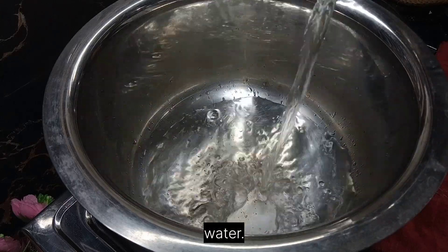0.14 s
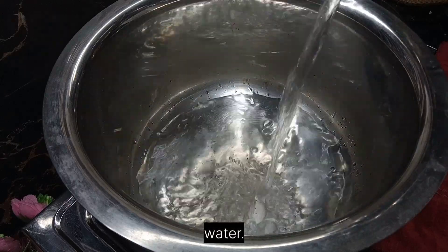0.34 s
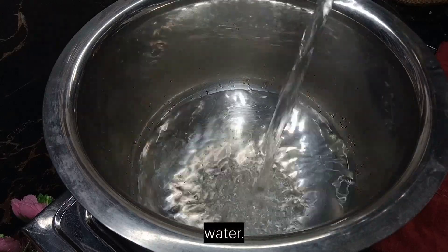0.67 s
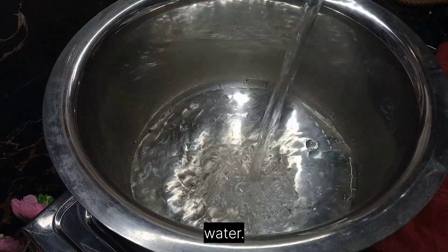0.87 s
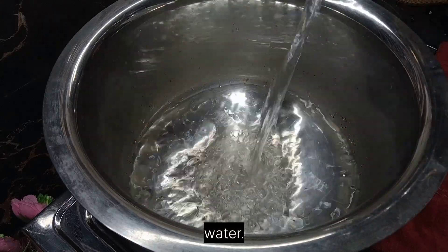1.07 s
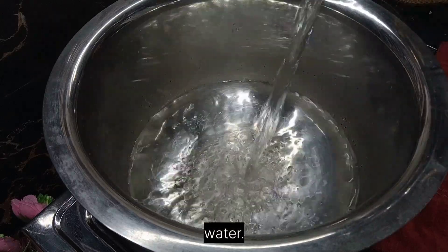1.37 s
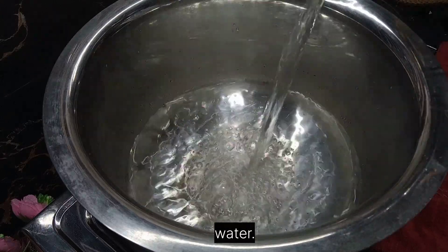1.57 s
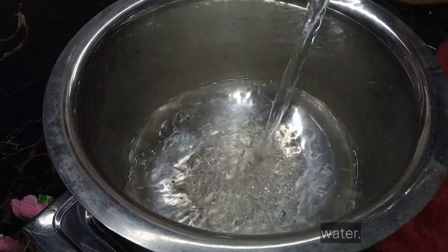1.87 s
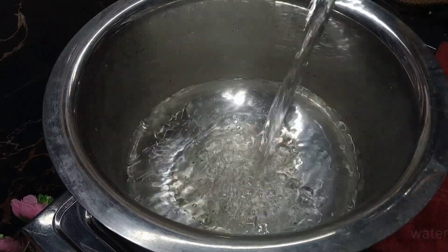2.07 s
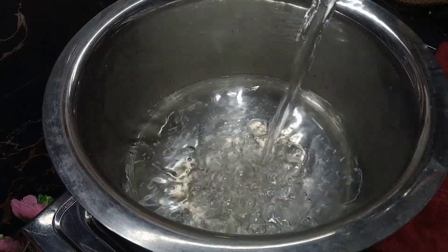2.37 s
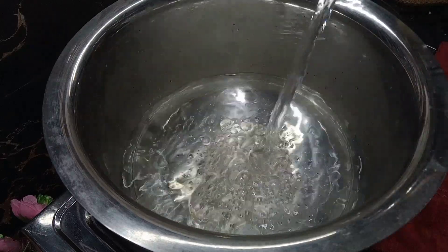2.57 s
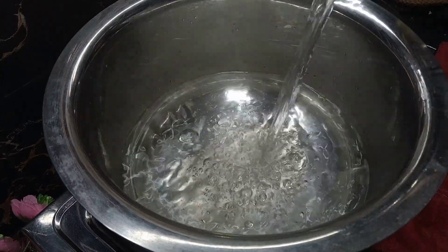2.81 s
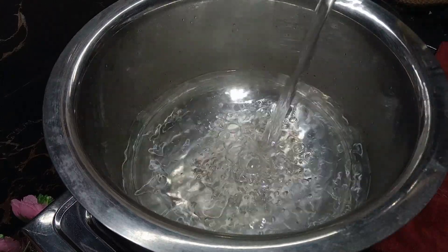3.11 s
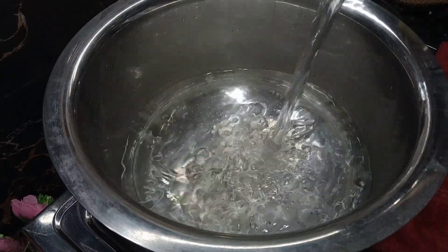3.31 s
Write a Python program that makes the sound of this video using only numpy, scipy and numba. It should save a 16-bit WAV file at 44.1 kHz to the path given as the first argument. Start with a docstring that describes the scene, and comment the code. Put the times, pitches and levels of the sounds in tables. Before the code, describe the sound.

Water pours steadily into a steel pot, bright metallic patter turning to deeper bubbling gulps

```python
"""A stream of water falls into a steel pot in a quiet kitchen, heard from just above the rim.
Pattering noise and tiny bubbles ring the pot; the ring of its bare bottom fades as the water deepens.
Large and small air pockets gulp as gliding, decaying sines that ring the water, lower and louder later on.
Splashes add a bubble and a burst of spray, drops spit as treble noise ticks, filtered noise rumbles faintly."""
import sys
import numpy as np
from scipy import signal
from scipy.fft import rfft, irfft
from scipy.io import wavfile
from scipy.ndimage import uniform_filter1d
from numba import njit

SR = 44100
rng = np.random.default_rng(int(sys.argv[2]) if len(sys.argv) > 2 else 0)


def waveform_to_disk(signal):
    """Save audio, clipped to [-1, 1], as 16-bit WAV at the path in sys.argv[1]."""
    frames = np.transpose(np.atleast_2d(signal))
    scaled = np.clip(frames, -1, 1) * 32767
    samples = np.round(scaled).astype(np.int16)
    wavfile.write(sys.argv[1], SR, samples)


N = 152145

# Big air pockets closing, before the water resonances:
# (time [s], level [dB], pitch [Hz], T60 [s], limited to 0.01-0.3 in use)
BIG_GULPS = [(0.873, -32, 658, 0.1), (0.977, -25, 663, 0.069), (1.014, -30.5, 646, 0.11),
             (1.215, -16.5, 672, 0.051), (1.25, -17.5, 644, 0.035), (1.509, -19.5, 632, 0.032),
             (1.536, -27, 639, 0.15), (1.616, -24, 833, 0.024), (1.658, -26, 632, 0.052),
             (1.702, -27, 584, 0.076), (1.912, -28, 637, 0.079), (1.952, -25.5, 605, 0.041),
             (2.002, -22.5, 662, 0.053), (2.015, -40.5, 223, 0.36), (2.1, -15, 600, 0.023),
             (2.123, -21, 593, 0.033), (2.167, -27.5, 700, 0.051), (2.198, -10, 644, 0.031),
             (2.257, -22, 638, 0.028), (2.303, -9.5, 508, 0.028), (2.327, -8.5, 597, 0.025),
             (2.36, -14, 515, 0.06), (2.427, -24.5, 640, 0.033), (2.493, -14.5, 620, 0.023),
             (2.578, -16.5, 514, 0.046), (2.613, -22.5, 536, 0.059), (2.686, -23, 680, 0.044),
             (2.723, -19.5, 639, 0.038), (2.752, -21.5, 540, 0.071), (2.77, -20.5, 626, 0.052),
             (2.813, -14.5, 668, 0.031), (2.898, -25, 635, 0.036), (2.953, -19, 558, 0.032),
             (3.028, 5.5, 650, 0.011), (3.052, -27.5, 571, 0.086), (3.078, -20, 481, 0.045),
             (3.134, -18, 550, 0.028), (3.163, -22.5, 670, 0.024), (3.247, -29, 624, 0.038),
             (3.272, -28.5, 450, 0.098), (3.298, -16, 611, 0.03), (3.318, -17, 680, 0.054),
             (3.348, -19, 506, 0.029)]
# Splashes: (time [s], bubble level [dB], bubble pitch [Hz], spray level re bubble [dB])
SPLASHES = [(0.0382, -25, 2720, -5), (0.088, -20.5, 1400, -24), (0.1296, -30.5, 3250, -6),
            (0.165, -17, 2620, -12.5), (0.2728, -24, 2740, -4), (0.403, -14, 2640, -16.5),
            (0.446, -20, 2650, -14.5), (0.5088, -22.5, 2710, -6.5), (0.9855, -27, 2750, -16),
            (1.064, -30.5, 2260, -4.5), (1.108, -26.5, 1470, -3.5), (1.2136, -23.5, 2050, -6.5),
            (1.263, -26, 2250, -14), (1.283, -25.5, 2850, -7.5), (1.4072, -29, 2000, -19),
            (1.506, -28, 2610, -8), (1.6121, -17.5, 2730, -12.5), (1.6557, -24.5, 2530, -25),
            (1.7252, -25, 2640, -8.5), (2.169, -26, 2120, -3), (2.2178, -25.5, 2660, -7),
            (2.239, -25.5, 2630, -6.5), (2.3445, -21, 2140, -8.5), (2.4898, -25.5, 2780, -6.5),
            (2.765, -23.5, 2080, -0.5), (2.859, -21.5, 2580, -8), (3.0287, -26, 2730, -7.5),
            (3.0805, -23.5, 2600, -16.5), (3.156, -21, 3270, -9), (3.2933, -12, 2950, -17.5),
            (3.3467, -28.5, 5160, -22)]
# Drops spitting: (time [s], level [dB], centre [Hz])
SPITS = [(1.066, -30.5, 5200), (1.293, -30.5, 5040), (2.2196, -26.5, 4800), (2.7516, -26, 4870),
         (3.0859, -30, 5170), (1.433, -30, 8200), (1.531, -30.5, 7900), (1.6005, -26, 7700),
         (1.707, -33, 8100), (2.0988, -29, 7600), (2.1963, -23.5, 7460), (2.3082, -32, 7990),
         (2.6426, -33.5, 6900), (2.6836, -23, 11400), (2.863, -34.5, 8200), (3.0275, -26, 5130)]
# Course of the stream: (time [s], patter [dB], fizz [dB], fine spray [dB], small gulps [dB],
# ring of the bottom [dB], mist [dB]); fizz, spray and mist act relative to their own means,
# patter and small gulps are trimmed below
STREAM = [(0.0, -39.5, -6, -2.5, -52, -44, -5), (0.5, -41, -11.5, -9.5, -56, -42.5, -10),
          (1.41, -41.5, -8.5, -5, -39.5, -52.5, -9.5), (1.95, -44, -7, -6, -45.5, -60, -6.5),
          (2.09, -42, -10, -7, -38.5, -54, -6.5), (3.1, -46, -5.5, -7, -41, -63, -6),
          (3.45, -44.5, -5, -5.5, -34.5, -53, -12)]
# Pot resonances: (centre [Hz], width [Hz], gain [dB])
POT_MODES = [(1634, 57, -4), (2110, 28, 11.5), (2715, 130, 6), (3304, 30, 4), (3830, 37, -39),
             (4990, 46, -12), (5540, 190, -11), (8140, 230, -26.5)]
# Resonances that the gulps ring: (centre [Hz], width [Hz], gain re WATER_DB [dB])
WATER_MODES = [(500, 12, -14), (560, 29, -7), (640, 34.2, 2), (693, 8.9, -0.5), (866, 28, 5.5)]
# Plain share of the patter, beside the pot modes: (frequency [Hz], gain re PATTER_BETWEEN_DB [dB])
PATTER_COLOUR = [(530, -43), (900, -16), (1420, -12.5), (1800, -11), (2660, 1.5), (3710, -6.5), (5000, -14),
                 (6300, -20), (8050, -7), (10600, -22), (15500, -20)]
# Spectral shape of the room rumble: (frequency [Hz], relative level per Hz [dB])
KITCHEN_COLOUR = [(15, -32), (25, -31), (102, 3.5), (158, 2.5), (210, -8.5), (297, -1.5), (438, -12),
                  (637, -7), (900, -19), (1170, -57), (1980, -120)]

KITCHEN_DB = -55.5
SPIT_T60_S, SPIT_TAIL_DB, SPIT_TAIL_T60_S = 0.0077, -19, 0.079
SPIT_WIDTH_RATIO = 0.38  # of the centre frequency
SPLASH_ATTACK_S, SPLASH_T60_S = 0.00079, 0.019
SPRAY_T60_S, SPRAY_LOW_HZ, SPRAY_TOP_HZ = 0.06, 580, 6460
GULP_ATTACK_S, GULP_GLIDE_PER_CYCLE, GULP_LOW_HZ, GULP_TOP_HZ = 0.0021, 0.0099, 208, 6000
SMALL_GULP_TRIM_DB, WATER_DB = -4.5, 2.5
SLOSH_HZ, SLOSH_DB = 331, -14.5  # level re the small-gulp column
PATTER_BETWEEN_DB, PATTER_TRIM_DB, TINY_DB = 5, -1.5, -4.5
SHARED_SWELL, STEADY_SWELL = 0.55, 0.6  # re each band's own swell
BANDS, LOWEST_BAND_HZ = 15, 700  # third-octave steps
FIZZ_HZ, FINE_SPRAY_HZ, MIST_HZ = 4200, 6000, 10000  # lower limits
BOTTOM_HZ, BOTTOM_WIDTH_HZ = 1393.4, 42
WALL_RIPPLE_DB, WALL_RIPPLE_HZ = 3, 71.6  # rms, smoothing width
SIDE_HZ, SIDE_DB = 7340, -16
TOP_HZ = 15480


def undb(db):
    """Amplitude from decibels."""
    return 10 ** (np.asarray(db) / 20)


def unit(x):
    """Scale to an rms of 1."""
    return x / np.sqrt(np.mean(x ** 2))


def curve(column):
    """One column of the stream table, per sample."""
    rows = np.array(STREAM)
    return np.interp(np.arange(N) / SR, rows[:, 0], rows[:, column])


def band(x, low_hz, high_hz):
    """Butterworth band-pass."""
    sos = signal.butter(3, [low_hz, high_hz], "band", fs=SR, output="sos")
    return signal.sosfilt(sos, x)


def ring(x, hz, width_hz):
    """Resonance with gain 1 at its centre."""
    b, a = signal.iirpeak(hz, hz / max(width_hz, 5), fs=SR)
    return signal.lfilter(b, a, x)


def colour(x, points):
    """Filter by (frequency [Hz], gain [dB]) points, joined on a log-frequency axis."""
    points_hz, points_db = np.array(points).T
    hz = np.maximum(np.arange(len(x) // 2 + 1) * SR / len(x), 1)
    gain_db = np.interp(np.log(hz), np.log(points_hz), points_db, left=-80)
    return irfft(rfft(x) * undb(gain_db), len(x))


@njit
def bubbles(n, sr, start_s, size, hz, t60_s, attack_s, glide_per_cycle):
    """Decaying sines that swell in and glide upward."""
    out = np.zeros(n)
    for k in range(len(start_s)):
        first, phase = int(start_s[k] * sr), 0.
        for j in range(min(int(t60_s[k] * sr), n - first)):
            t = j / sr
            phase += 2 * np.pi * hz[k] * (1 + glide_per_cycle * hz[k] * t) / sr
            swell_in = 1 - np.exp(-(t / attack_s) ** 2)
            decay = 1000. ** (-t / t60_s[k])
            out[first + j] += size[k] * swell_in * decay * np.sin(phase)
    return out


def bursts(times_s, db, t60_s):
    """Envelope of sudden onsets that die away."""
    kicks = np.zeros(N)
    first = np.clip((np.asarray(times_s) * SR).astype(int), 0, N - 1)
    np.add.at(kicks, first, undb(db))
    return signal.lfilter([1], [1, -1000. ** (-1 / (t60_s * SR))], kicks)


def swarm(count, spread_db):
    """Random times [s], sizes [dB] with a few large ones, and two more 0-1 draws for each."""
    draws = rng.random((count, 4)).T
    times_s = draws[0] * (N - 1) / SR
    sizes_db = -spread_db * np.log(1 - .98 * draws[1])
    return times_s, sizes_db, draws[2], draws[3]


def clusters(count):
    """Random swells, quick to come and slower to go."""
    times_s, db, _, _ = swarm(count, spread_db=3.5)
    return unit(uniform_filter1d(bursts(times_s, db, t60_s=0.027), int(0.0026 * SR)))


def kitchen():
    """Low steady rumble of the room: coloured noise."""
    shape = KITCHEN_COLOUR + [(3000, -69)]
    return unit(colour(rng.standard_normal(N), shape)) * undb(KITCHEN_DB)


def wall(x):
    """Countless close modes of the thin wall: a fine, fixed ripple over the treble."""
    width_bins = int(WALL_RIPPLE_HZ * N / SR)
    ripple = uniform_filter1d(rng.standard_normal(N // 2 + 1), width_bins)
    ripple = unit(uniform_filter1d(ripple, width_bins))
    hz = np.arange(N // 2 + 1) * SR / N
    fade_in = np.clip(hz / 3000, 0, 1)
    return irfft(rfft(x) * undb(WALL_RIPPLE_DB * ripple * fade_in), N)


def pot(x):
    """Resonances of the pot, in alternating polarity, over a plain coloured share of the sound."""
    plain = undb(PATTER_BETWEEN_DB) * colour(x, PATTER_COLOUR)
    modes = 0
    for k, (hz, width_hz, db) in enumerate(POT_MODES):
        modes = modes + (-1) ** k * undb(db) * ring(x, hz, width_hz)
    return plain + modes


def spits():
    """Sharp treble ticks of resonated noise, each with its own colour and a short hiss after it."""
    out, noise = 0, rng.standard_normal(N)
    for time_s, db, hz in SPITS:
        tick = bursts([time_s], db, SPIT_T60_S)
        tail = bursts([time_s], db + SPIT_TAIL_DB, SPIT_TAIL_T60_S)
        width_hz = SPIT_WIDTH_RATIO * hz
        out = out + (tick + tail) * unit(ring(ring(noise, hz, width_hz), hz, width_hz))
    return out


def splashes():
    """A small ringing bubble and a burst of spray noise through the pot."""
    time_s, db, hz, spray_db = np.array(SPLASHES).T.copy()
    t60_s = SPLASH_T60_S + 0 * time_s
    drops = bubbles(N, 1. * SR, time_s, undb(db), hz, t60_s, SPLASH_ATTACK_S, 0.0022)
    noise = unit(band(pot(rng.standard_normal(N)), SPRAY_LOW_HZ, SPRAY_TOP_HZ))
    return drops + bursts(time_s, db + spray_db, SPRAY_T60_S) * noise


def gulps():
    """Large bubbles and many smaller ones ring the water in the pot; a low slosh of noise joins them."""
    time_s, db, hz, t60_s = np.array(BIG_GULPS).T.copy()
    t60_s = np.clip(t60_s, .01, .3)
    big = bubbles(N, 1. * SR, time_s, undb(db), hz, t60_s, GULP_ATTACK_S, GULP_GLIDE_PER_CYCLE)

    time_s, db, a, b = swarm(count=1100, spread_db=3.0)
    hz = (600 - 65 * time_s) * 2 ** (0.9 * a ** 1.218)  # sinks with time
    t60_s = 0.024 + 0.045 * b
    small = bubbles(N, 1. * SR, time_s, undb(db), hz, t60_s, GULP_ATTACK_S, GULP_GLIDE_PER_CYCLE)

    noise = (0.6 + clusters(count=150)) * rng.standard_normal(N)
    slosh = unit(band(noise, SLOSH_HZ / 1.46, SLOSH_HZ * 1.68)) * undb(SLOSH_DB)

    level_db = curve(column=4)
    both = big + unit(small) * undb(level_db + SMALL_GULP_TRIM_DB)
    rung = sum(undb(g) * ring(both, f, w) for f, w, g in WATER_MODES)
    both = both + undb(WATER_DB) * rung
    return band(both, GULP_LOW_HZ, GULP_TOP_HZ) + slosh * undb(level_db)


def patter():
    """Stream noise swelling per third-octave, partly in common, with tiny bubbles and the bottom's ring."""
    time_s, db, a, b = swarm(count=5000, spread_db=4.0)
    hz = 1000 * 2 ** (3.8 * a ** 1.4)
    t60_s = (25 + 40 * b) / hz
    tiny = unit(bubbles(N, 1. * SR, time_s, undb(db), hz, t60_s, 0.00031, 0.0036))
    together = clusters(count=200)
    hiss = pot(rng.standard_normal(N))
    drops = pot(undb(TINY_DB) * tiny)
    scale = np.sqrt(np.mean(band(hiss, 1800, 4000) ** 2))

    bin_hz = np.maximum(np.arange(N // 2 + 1) * SR / N, 1)
    step = 3 * np.log2(bin_hz / LOWEST_BAND_HZ)
    hiss, drops, out = rfft(hiss), rfft(drops), 0
    for k in range(BANDS):
        centre_hz = LOWEST_BAND_HZ * 2 ** (k / 3)
        if centre_hz < FIZZ_HZ:
            tilt_db = 0
        else:
            column = 2 if centre_hz < FINE_SPRAY_HZ else 3 if centre_hz < MIST_HZ else 6
            tilt_db = curve(column) - np.mean(curve(column))
        share = np.clip(1 - np.abs(step - k), 0, 1)  # overlapping triangles
        swell = unit(STEADY_SWELL + SHARED_SWELL * together + clusters(count=200))
        band_sound = swell * irfft(share * hiss, N) + irfft(share * drops, N)
        out = out + undb(tilt_db) * band_sound / scale

    knocks = (0.1 + together) * rng.standard_normal(N) + tiny
    bottom = unit(ring(knocks, BOTTOM_HZ, BOTTOM_WIDTH_HZ)) * undb(curve(column=5))
    return undb(curve(column=1) + PATTER_TRIM_DB) * out + bottom


def scene():
    """All from the centre, plus faint noise of opposite sign left and right that follows the treble level."""
    mid = gulps() + wall(patter() + splashes() + spits()) + kitchen()
    top = band(mid, SIDE_HZ, 13000)
    envelope = np.sqrt(uniform_filter1d(top ** 2, size=200) + 1e-18)
    side = undb(SIDE_DB) * band(envelope * rng.standard_normal(N), SIDE_HZ, 22000)
    return np.array([mid + side, mid - side])


def record(dry):
    """The recorder cuts the top: steep elliptic low-pass."""
    return signal.sosfilt(signal.ellip(14, .2, 70, TOP_HZ, fs=SR, output="sos"), dry)


dry = scene()
out = record(dry)
waveform_to_disk(out)
```